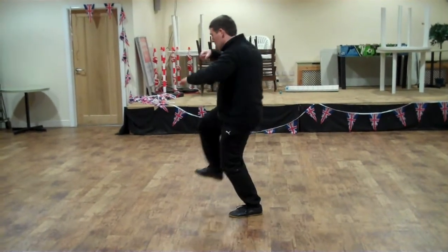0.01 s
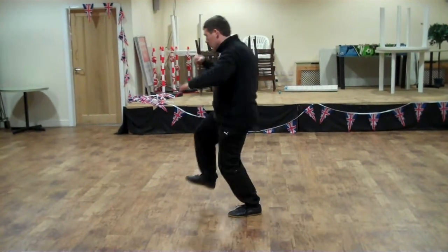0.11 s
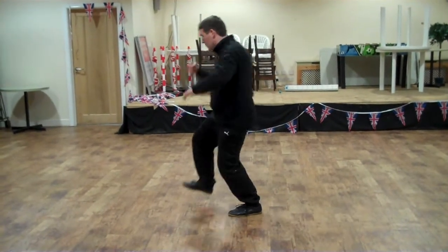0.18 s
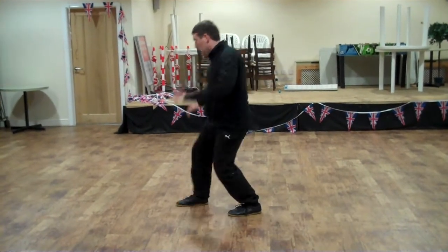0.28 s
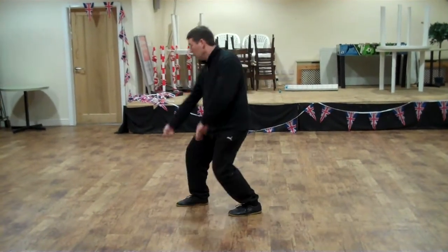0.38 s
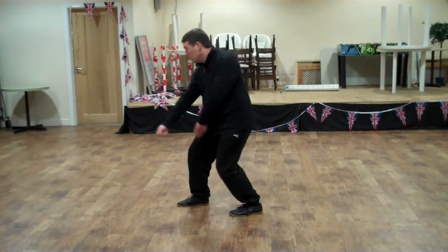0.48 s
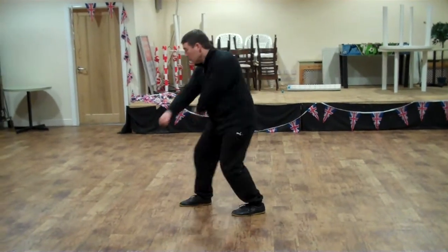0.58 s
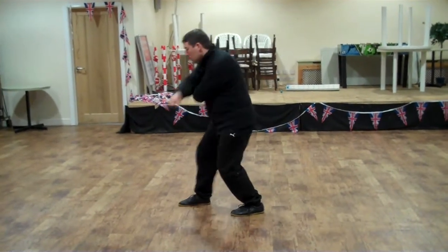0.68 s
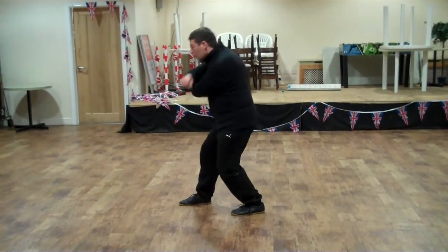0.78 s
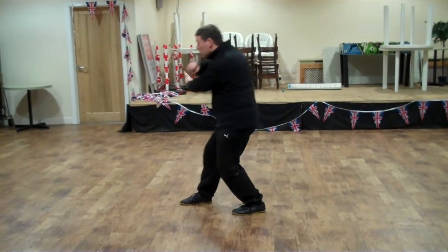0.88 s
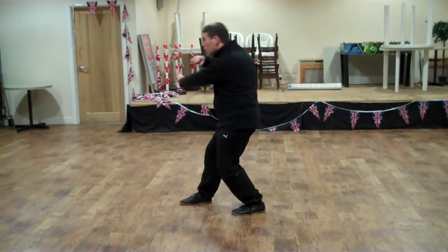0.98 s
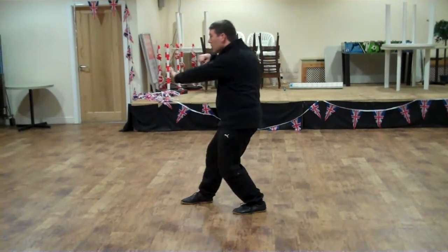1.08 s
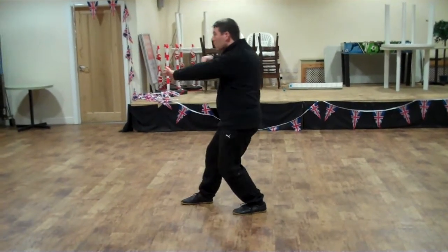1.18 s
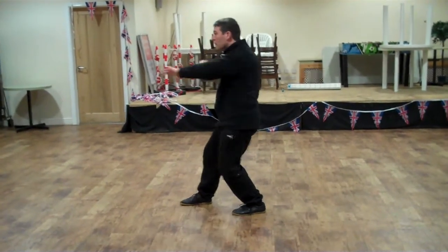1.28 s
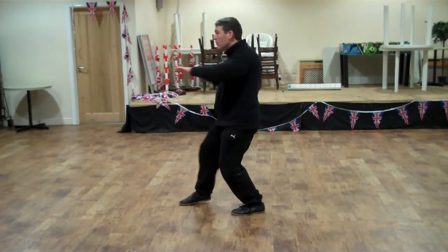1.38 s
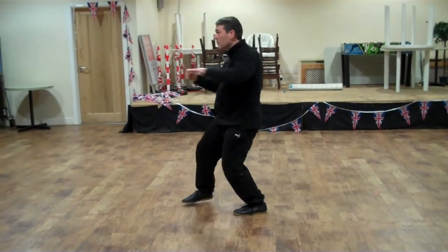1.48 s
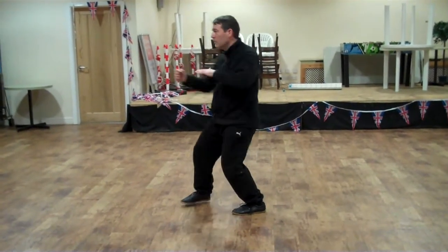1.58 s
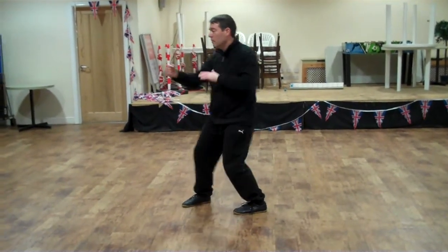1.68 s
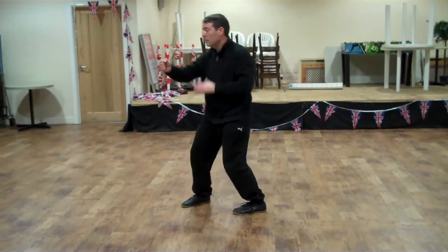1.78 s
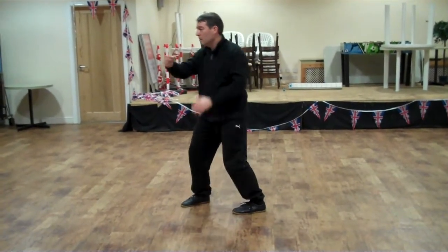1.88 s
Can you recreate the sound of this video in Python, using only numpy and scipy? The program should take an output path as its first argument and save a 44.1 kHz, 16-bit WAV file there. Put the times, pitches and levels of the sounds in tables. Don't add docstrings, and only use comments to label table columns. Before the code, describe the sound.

Foot stamps on floorboards: one sharp and heavy near the start, one lighter and drier towards the end, each with a long hall echo, slight shoe sliding and low ventilation noise, heard at a distance in stereo.

```python
import sys
import numpy as np
from scipy import signal
from scipy.io import wavfile

SR = 44100
rng = np.random.default_rng(int(sys.argv[2]) if len(sys.argv) > 2 else 0)


def transcribe(u):
    v = np.clip(np.atleast_2d(u).T, -1, 1)
    q = np.round(v * 32767).astype(np.int16)
    wavfile.write(sys.argv[1], SR, q)


def volts_from_db(level):
    exponent = np.asarray(level, float) / 20
    return 10 ** exponent


N = 85995


def rms_one(x):
    return x / np.sqrt(np.mean(x ** 2) + 1e-20)


def at_hz(points, hz):
    table_hz, values = np.array(points).T
    return np.interp(np.log(hz), np.log(table_hz), values)


def density(table):
    grid_hz = np.arange(60., 14000, 20)
    return 1 / np.sqrt(np.mean(volts_from_db(2 * at_hz(table, grid_hz))) * 28000 / SR)


def drift(rate_hz):
    r = np.exp(-80 * np.pi * rate_hz / SR)
    slow = signal.lfilter([1], [1, -2 * r, r * r], rng.standard_normal(N // 40 + 2002))[2000:]
    return np.interp(np.arange(N) / 40, np.arange(len(slow)), rms_one(slow))


def filtered(x, order, hz, kind="low"):
    return signal.sosfilt(signal.butter(order, hz, kind, fs=SR, output="sos"), x)


def ring(clicks, hz, t60_s):
    r = volts_from_db(-60 / (t60_s * SR))
    w = 2 * np.pi * hz / SR
    return signal.lfilter([0, np.sin(w)], [1, -2 * r * np.cos(w), r * r], clicks + 1e-18)


def coloured(x, peaks):
    for hz, width_hz, boost_db in peaks:
        r = np.exp(-np.pi * width_hz / SR)
        poles = [1, -2 * r * np.cos(2 * np.pi * hz / SR), r * r]
        resonance = signal.lfilter((1 - r * r) / 2 * np.array([1, 0, -1]), poles, x)
        x = x + (volts_from_db(boost_db) - 1) * resonance
    return x


def bands():
    # hz, likeness (1 = the same, 0 = unrelated)
    likeness = [(60, 0.79), (180, 0.94), (550, 1), (1640, 0.55), (4950, -0.12), (14900, 0.079)]
    # hz, left_over_right_db
    balance = [(60, 4), (240, 2.5), (950, 0.5), (3760, 6), (14900, 3)]
    borders_hz = 28 * 2 ** np.arange(0, 9.2, 1 / 3)
    white = rng.standard_normal((2, 2, N))
    for k, (low_hz, high_hz) in enumerate(zip(borders_hz, borders_hz[1:])):
        mid, side = filtered(white[k % 2], 2, [low_hz, high_hz], "band")
        hz = np.sqrt(low_hz * high_hz)
        alike = np.clip(at_hz(likeness, hz), -1, 1)
        lean = volts_from_db(at_hz(balance, hz) / 2 * np.array([[1], [-1]]))
        yield hz, lean * (np.sqrt(1 + alike) * mid + np.sqrt(1 - alike) * side * [[1], [-1]])


def hum():
    hum_hz, level_db, waver_db = 100.8, -64, 1
    swell = volts_from_db(level_db + waver_db * drift(1))
    return np.sqrt(2) * swell * np.sin(2 * np.pi * hum_hz * np.arange(N) / SR)


def air():
    # hz, level_db
    air_tone = [(30, -22.5), (80, -22), (140, -15.5), (600, -10.5), (1200, -18.5), (2000, -23), (6000, -34),
                (14000, -39)]
    level_db = -53.5
    out = np.zeros((2, N))
    for hz, noise in bands():
        out += volts_from_db(level_db + at_hz(air_tone, hz)) * density(air_tone) * noise[:, ::-1]
    return out


def slide():
    # time_s, level_db
    course = [(0, -62.5), (.2, -65), (1.0, -94), (1.2, -65.5), (1.4, -62.5), (1.56, -71), (1.6, -85),
              (1.95, -56)]
    time_s, level_db = np.transpose(course)
    low_hz, high_hz, grains_per_s = 4200, 8800, 13000
    grit = rng.standard_normal((2, N)) * (rng.random((2, N)) < grains_per_s / SR)
    hiss = rms_one(filtered(grit, 2, [low_hz, high_hz], "band"))
    pressure_db = np.interp(np.arange(N) / SR, time_s, level_db) + 1.5 * drift(15)
    return hiss * volts_from_db(pressure_db) * volts_from_db(np.array([[3.0], [-3.0]]))


def hall():
    # start_s, level_db, build_up_s
    tail_starts = [
        (0.2467, -22, 0.002),
        (1.608, -34, 0.004),
    ]
    # hz, level_db
    heavy_tone = [(50, -18.5), (250, -7.5), (650, -0.5), (1400, -3.5), (4000, -10), (8000, -13),
                  (10500, -61), (15000, -38)]
    light_tone = [(60, -39), (300, -4), (700, -5.5), (1400, -4), (2500, -4.5), (4500, -8.5), (8000, -12),
                  (11000, -50)]
    # hz, t60_s
    hall_t60 = [(80, 0.8), (250, 1.55), (650, 1.577), (1500, 1.587), (3000, 1.275), (5500, 1.026),
                (8000, 0.41), (12000, 0.35)]
    # hz, width_hz, boost_db
    board_peaks = [
        [(333, 44, 8), (803, 58, 3.5), (630, 80, 6.5), (1510, 99, 4), (445, 66, -9), (1376, 168, -9),
         (3770, 170, 6), (918, 51, 4.5)],
        [(865, 200, 8), (664, 60, 6), (2040, 940, 5.5), (1360, 76, 4.5), (4230, 570, 3.5), (1630, 190, -16.5),
         (530, 77, -19), (3250, 300, -9.5)],
    ]
    low_late_cycles, early_db, early_s = 4.5, -5, 0.24
    wall_s, wall_spread_s, wall_db = 0.089, 0.013, 3.5
    t = np.arange(N) / SR
    tails = np.zeros((2, 2, N))
    for hz, noise in bands():
        for k, ((start_s, level_db, rise_s), tone) in enumerate(zip(tail_starts, [heavy_tone, light_tone])):
            age = np.maximum(t - start_s, 0)
            build_up = 1 - np.exp(-age / (rise_s + low_late_cycles / hz))
            held_back_db = early_db * np.exp(-age / early_s)
            far_wall_db = wall_db * np.exp(-((age - wall_s) / wall_spread_s) ** 2)
            decay_db = -60 * age / at_hz(hall_t60, hz)
            shape = build_up * volts_from_db(held_back_db + far_wall_db + decay_db)
            loudness = volts_from_db(level_db + at_hz(tone, hz)) * density(tone)
            tails[k] += shape * loudness * np.roll(noise, k * N // 2, axis=1)
    return coloured(tails[0], board_peaks[0]) + coloured(tails[1], board_peaks[1])


def boom():
    start_s, level_db, boom_hz, t60_s = .255, -41, 79.4, 0.31
    age = np.maximum(np.arange(N) / SR - start_s, 0)
    fade = volts_from_db(level_db - 60 * age / t60_s)
    return fade * (1 - np.exp(-age * boom_hz)) * np.sin(2 * np.pi * boom_hz * age)


def slaps():
    arrivals = [.2430, .2454, .2497, .2517, .2553, .2564, .2582, .2604, .2628, .2670, .2696, .2773, .2857,
                .2898, 1.6082, 1.6113, 1.6128, 1.6160, 1.6196, 1.6228, 1.6270]
    # crack_db, knock_db, thud_db, crack_left_over_right_db, knock_left_over_right_db
    strengths = [(-37, -35, -34, 4, 2), (-13, -17, -17, 7, 7), (-14, -10, -22, 6, 8), (-18, -2, -25, 6, 7),
                 (-14, -13, -20, 6, 4), (-19, -8, -14, 6, 5), (-7, -13, -12, 6, 4), (-16, -19, -21, 7, 9),
                 (-8, -8, -16, 8, 12), (-16, -18, -24, 5, 7), (-7, -13, -18, 3, 6), (-19, -15, -17, 10, 8),
                 (-16, -17, -19, 9, 3), (-17, -20, -17, 9, 4), (-8, -12, -27, 13, 6), (-17, -10, -24, 5, 7),
                 (-18, -14, -30, 5, 4), (-21, -19, -25, 5, 4), (-25, -15, -31, 6, 8),
                 (-22, -15, -26, 13, 8), (-32, -23, -30, 0, 2)]
    # hz, level_db, t60_s
    crack = [(7440, 1, 0.0027), (5370, -3, 0.0022), (9440, -8, .003)]
    knock = [(2110, -14, 0.0095), (4520, 4, 0.0048), (1705, -7, 0.0051), (2850, -24, 0.0052)]
    thud = [(1020, -1, 0.0086), (817, 0, 0.018), (650, -3.5, 0.014), (316, -3.5, 0.048), (210, -17, 0.01)]
    soft_hz = [11500, 4860, 1490]
    contact_s, spread_db, own_db, lag_s = .00023, 1.5, 1.5, .00008
    rows = np.array(strengths)
    out = np.zeros((2, N))
    for part, (modes, lean_db) in enumerate([(crack, rows[:, 3]), (knock, rows[:, 4]), (thud, 1.5)]):
        bright = part < 2
        for k, (hz, mode_db, t60_s) in enumerate(modes):
            chance = rng.normal(0, 1, (len(rows), 5))
            clicks = np.zeros((2, N))
            for touch, push in enumerate([-.7, .9]):
                strength = volts_from_db(rows[:, part] + mode_db + spread_db * chance[:, touch])
                left = (-1) ** k * push * strength
                right = left * volts_from_db(bright * own_db * chance[:, 2 + touch] - lean_db)
                left_s = np.array(arrivals) + touch * contact_s
                right_s = left_s + bright * lag_s * chance[:, 4]
                clicks[0, (left_s * SR).astype(int)] += left
                clicks[1, (right_s * SR).astype(int)] += right
            out += ring(filtered(clicks + 1e-18, 2, soft_hz[part]), hz, t60_s)
    out = filtered(out, 2, 140, "high")
    return filtered(out, 6, 8630) + volts_from_db(-23) * out


def scene():
    # hz, width_hz, boost_db
    colour_peaks = [(702, 123, 3.5), (7380, 1470, 8.5), (135, 8.3, 7.5), (440, 22, 2.5)]
    diffuse = (air() + hall()) * volts_from_db(-1.0) + slide() * volts_from_db(-5.0)
    return hum() + coloured(diffuse, colour_peaks) + boom() + slaps()


def top_cut(x):
    return signal.sosfilt(signal.butter(12, 15520, fs=SR, output="sos"), x)


def record(dry):
    top = 1.1
    rounded = top * np.tanh(dry / top)
    return top_cut(rounded)


dry = scene()
out = record(dry)
transcribe(out)
```